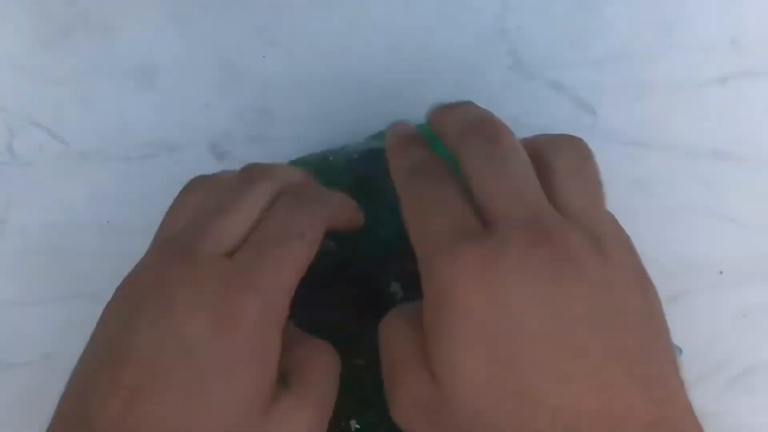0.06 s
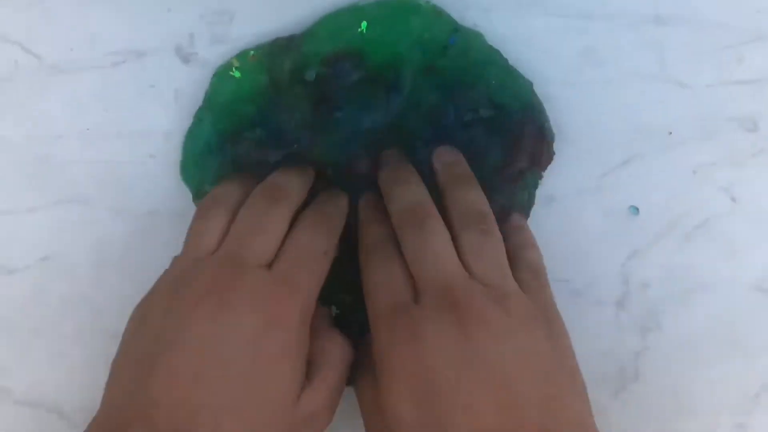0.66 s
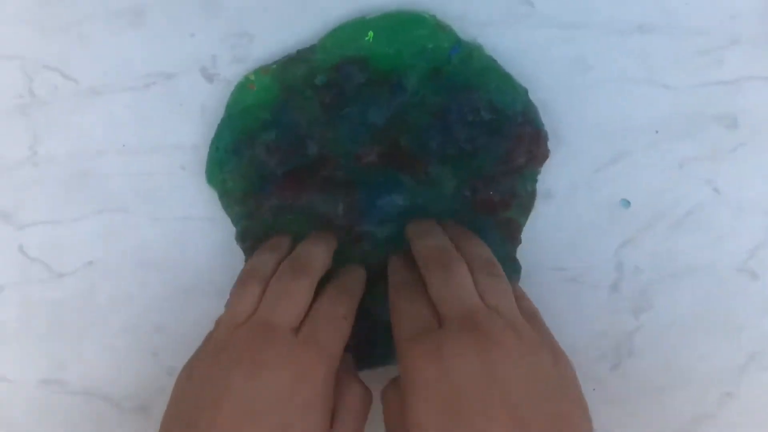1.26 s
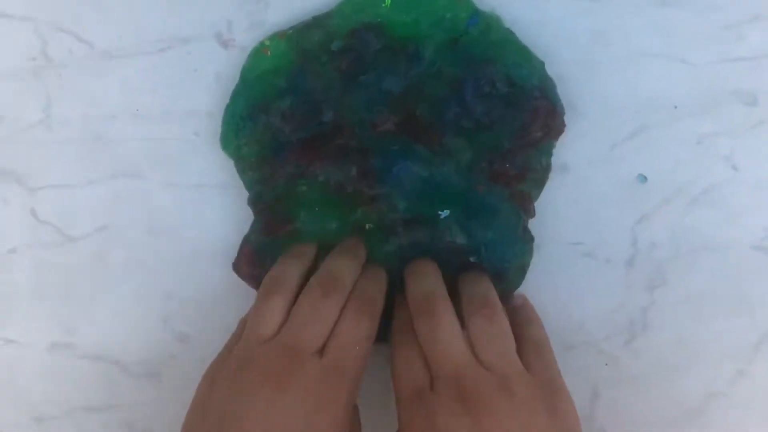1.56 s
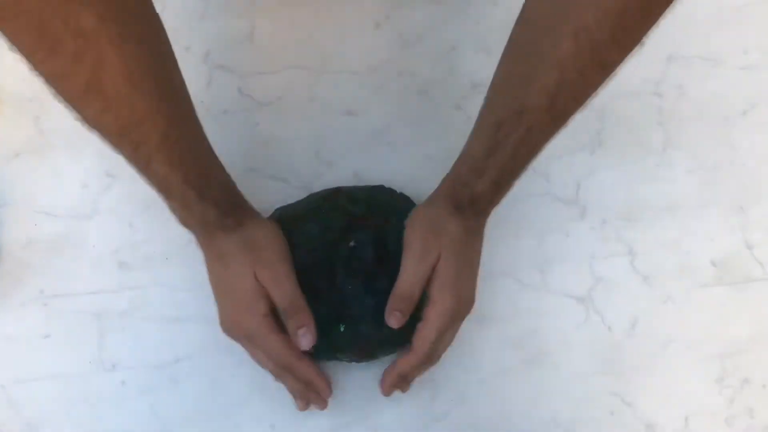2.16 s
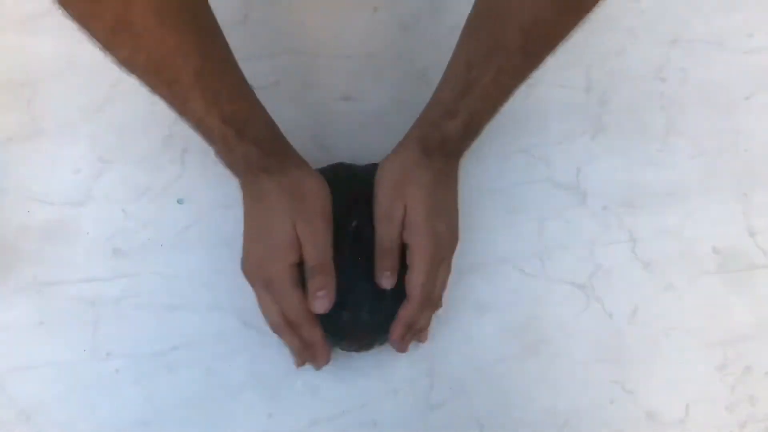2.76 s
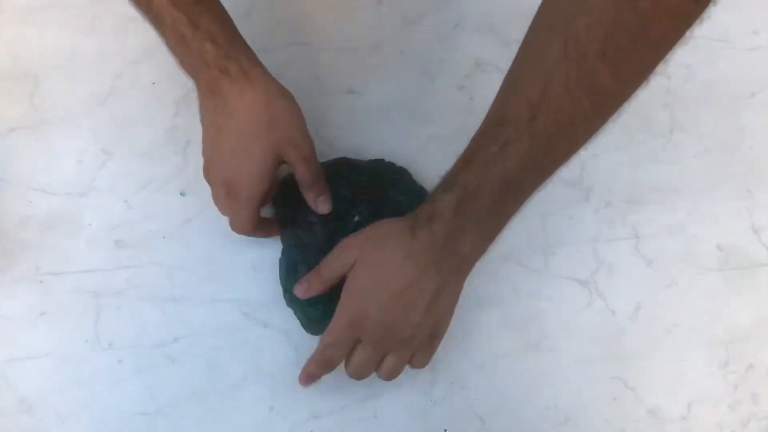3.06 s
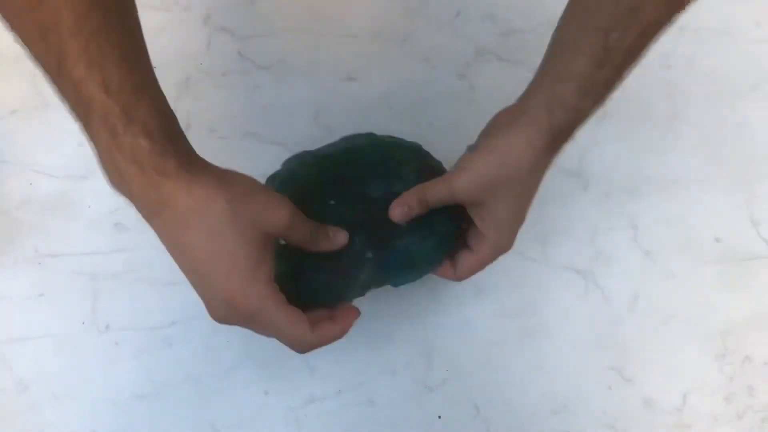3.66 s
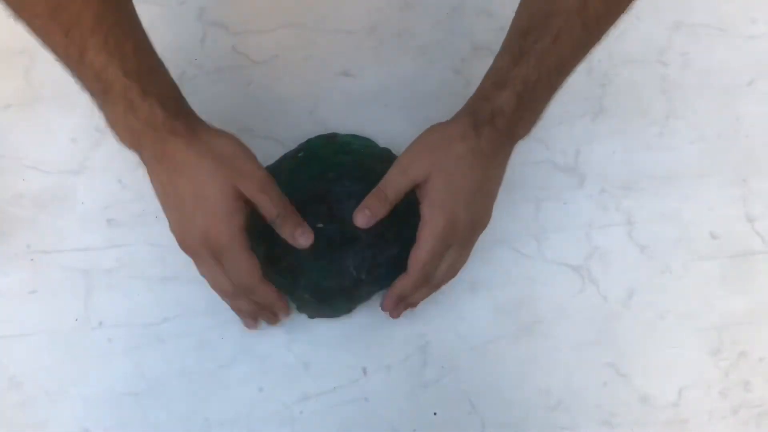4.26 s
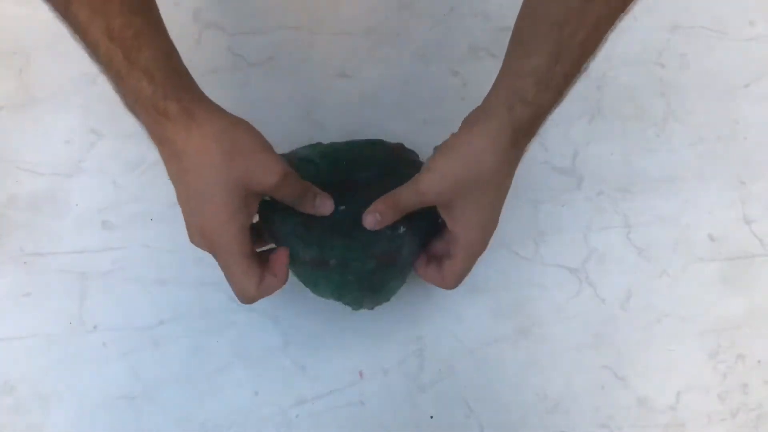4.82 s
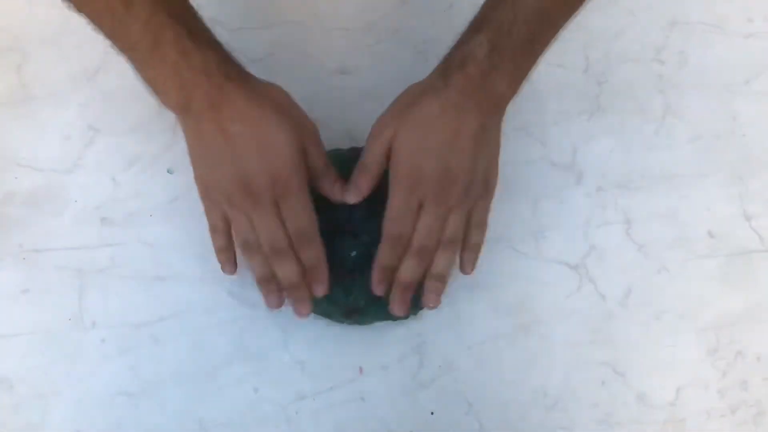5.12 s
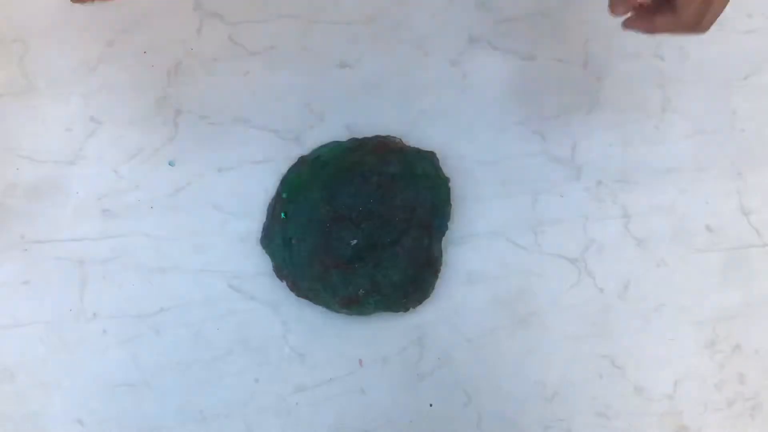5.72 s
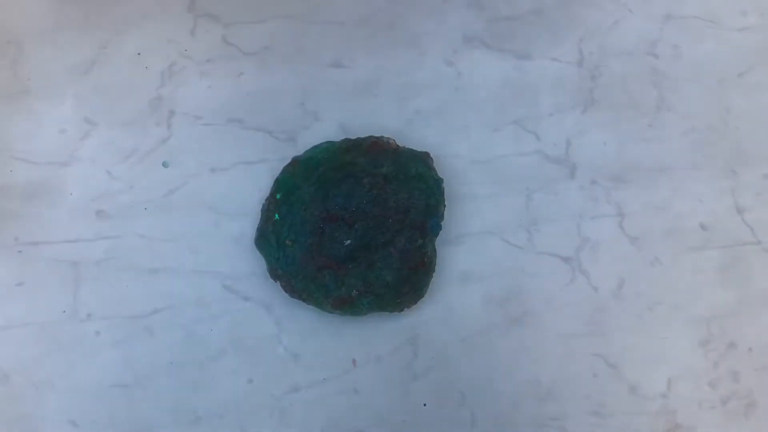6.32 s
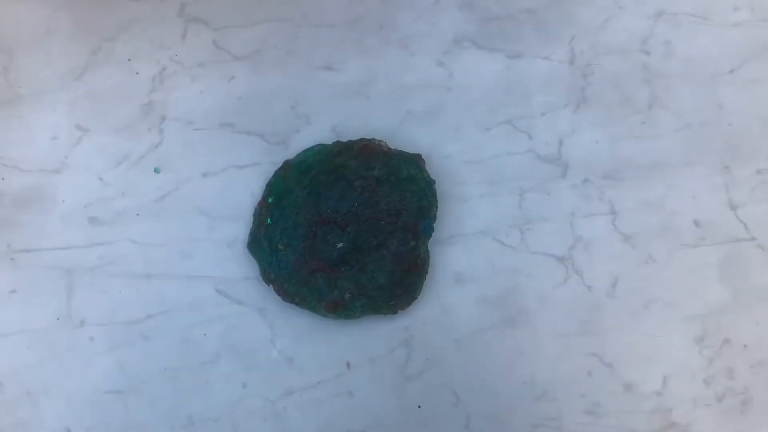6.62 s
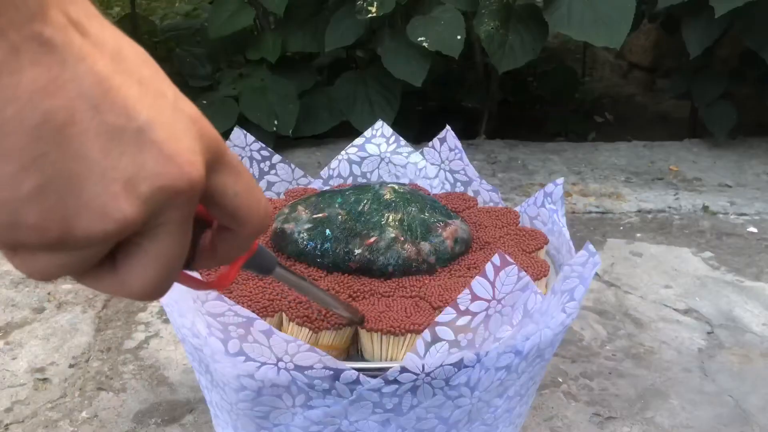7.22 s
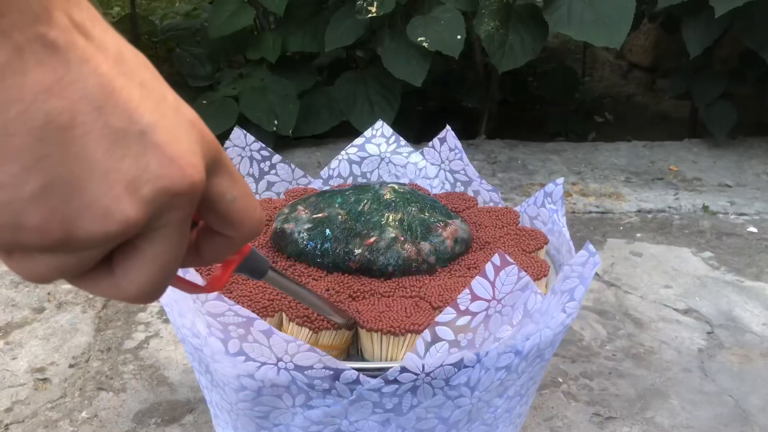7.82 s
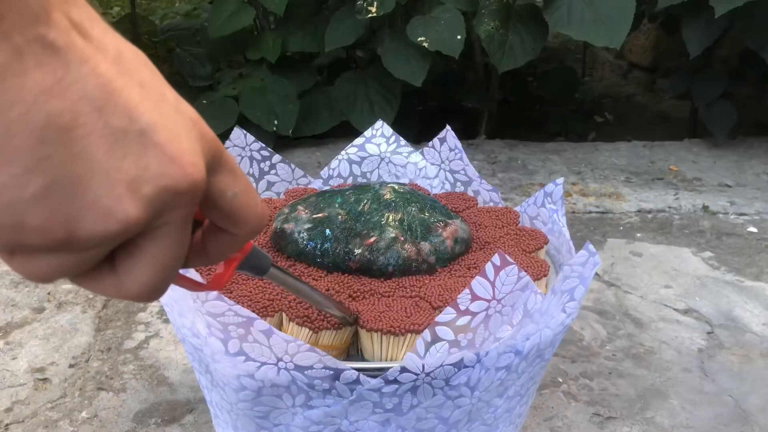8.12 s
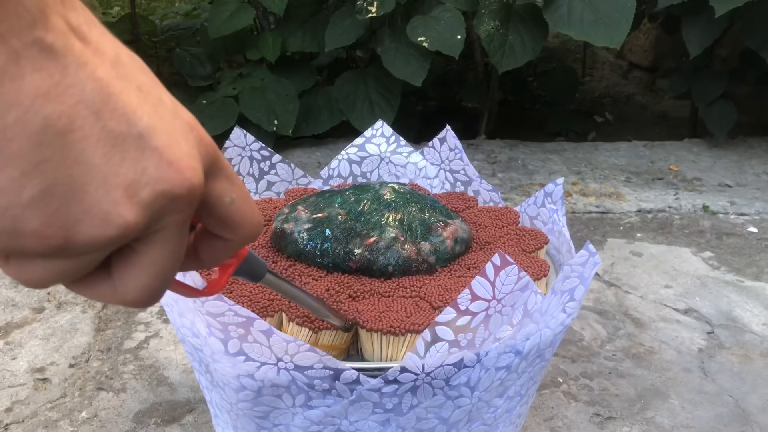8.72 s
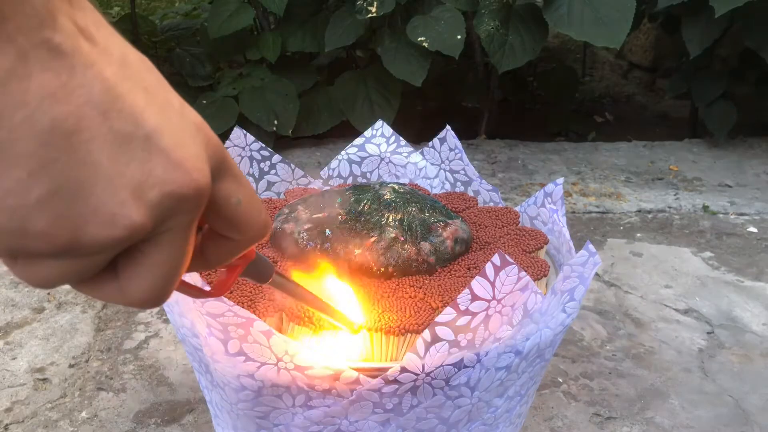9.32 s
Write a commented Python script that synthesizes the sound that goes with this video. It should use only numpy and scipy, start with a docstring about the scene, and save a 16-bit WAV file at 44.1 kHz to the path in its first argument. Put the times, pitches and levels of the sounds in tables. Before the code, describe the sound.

For the first two seconds, hands knead slime close to the microphone in a small room: wet squirts, bubbly pops, dull plops and fine sticky ticks over a low background hum. From about 1.9 seconds the kneading is further off, quieter and sparser, with soft rubbing and low thumps as the lump is pressed onto the table. It stops around 5.5 seconds, leaving quiet room noise with a thin, faint whine. Faint, distant bird-like chirps come between 3.3 and 3.9 seconds and again between 6 and 7.

At about 7 seconds the place changes to a yard with a steady distant rumble. A lighter trigger is pulled twice, each pull a run of small clicks ending in a sharp snap, at 7.4 and 8.2 seconds, followed by light rattles. One chirp sounds near 8.9 seconds. From 9.1 seconds match heads flare with a rush of gas and fine sputtering.

```python
"""Wet squirts and pops come from slime kneaded on a table top, first close by, then further off.
Trapped air tears out through the folds, opening pockets resonate, and the sticky skin ticks as it peels.
Pushes make the table boom, and faint bird-like chirps sound far away. Then, in a rumbling yard,
a piezo lighter is pulled twice, each impact ringing its barrel and grip, and a bundle of match heads
flares up with a rush of gas."""
import sys
import numpy as np
from scipy import signal
from scipy.fft import rfft, irfft, next_fast_len
from scipy.io import wavfile

SR = 44100
rng = np.random.default_rng(int(sys.argv[2]) if len(sys.argv) > 2 else 0)


def inscribe(sig):
    """Save sig as 16-bit PCM at rate SR to the path in sys.argv[1].

    A 1-D sig is mono; a 2-D sig holds one channel per row.
    Samples are clipped to [-1, 1] before scaling.
    """
    pcm = np.round(np.clip(np.atleast_2d(sig).T, -1, 1) * 32767)
    wavfile.write(sys.argv[1], SR, pcm.astype(np.int16))


N = 413658
TIME = np.arange(N) / SR
FAR_S, YARD_S = 1.891, 7.055  # the slime is further off; the yard begins


def undb(db):
    """Decibels to amplitude ratio."""
    return 10 ** (np.asarray(db) / 20)

def unit(x):
    """Normalisation to rms 1."""
    return x / np.sqrt(np.mean(x ** 2))

def at_hz(points, hz):
    """Interpolation of (frequency_hz, value) points on a log-frequency axis."""
    frequencies, values = np.transpose(points)
    return np.interp(np.log(np.maximum(hz, 1)), np.log(frequencies), values)

def add(track, start_s, sound):
    """Superposition: a sound joins the track at start_s."""
    i = max(int(start_s * SR), 0)
    track[i:i + len(sound)] += sound[:N - i]

def colour(x, points, size=4096):
    """Minimum-phase filtering to a (frequency_hz, density_db) spectrum, at unit power gain."""
    cepstrum = irfft(np.log(undb(at_hz(points, np.fft.rfftfreq(size, 1 / SR)))))
    cepstrum[1:size // 2] *= 2
    cepstrum[size // 2 + 1:] = 0
    response = irfft(np.exp(rfft(cepstrum)))
    return signal.fftconvolve(x, response / np.linalg.norm(response))[:len(x)]

def octaves(x):
    """Band splitting into overlapping octaves from 32 Hz up: yields (centre_hz, band)."""
    size = next_fast_len(len(x))
    spectrum = rfft(x, size)
    octave = np.log2(np.linspace(1, SR / 2, len(spectrum)) / 32)
    for k in range(10):
        yield 32 * 2 ** k, irfft(spectrum * np.maximum(1 - abs(octave - k), 0), size)[:len(x)]

def waver(rate_hz):
    """Slow random modulation with a spread near 1."""
    steps = rng.standard_normal(4096)
    return np.interp(TIME * rate_hz, np.arange(len(steps)), steps)

def moving_air(spectrum, flicker_db, rate_hz):
    """Fluctuating flow: coloured noise whose octaves waver independently."""
    noise = colour(rng.standard_normal(N), spectrum)
    return unit(sum(band * undb(flicker_db * waver(rate_hz)) for _, band in octaves(noise)))

def ring(modes, t):
    """Free vibration: each mode is an exponentially damped sine."""
    return sum(undb(db) * np.sin(2 * np.pi * hz * t) * 1000 ** (-t / t60) for hz, db, t60 in modes)

def reverb(x, decay_times, tilt_db, build_s):
    """Diffuse field: each octave has its own decay; the level tilts by tilt_db an octave about 1 kHz."""
    t = TIME[:SR]
    tail = sum(band * 1000 ** (-t / at_hz(decay_times, hz)) * undb(tilt_db * np.log2(hz / 1000))
               for hz, band in octaves(rng.standard_normal(SR)))
    return signal.fftconvolve(x, tail * (1 - np.exp(-t / build_s)) / np.sqrt(SR / 32))[:N]

def ruptures(count, per_s, spread_db):
    """Poisson process: tiny impulses of random sign and unequal size."""
    impulses = (rng.random(count) < per_s / SR) * rng.choice([-1, 1], count)
    return impulses * undb(spread_db * np.minimum(rng.exponential(size=count), 4))

def tearing(runs, per_s, spread_db, edge=1):
    """Shot noise that swells and fades in each (start_s, length_s, rms_db); a small edge flattens it."""
    out = np.zeros(N)
    for start_s, length_s, db in runs:
        count = int(length_s * SR)
        crackle = ruptures(SR, per_s, spread_db) + rng.standard_normal(SR) / 20
        arch = abs(np.sin(np.linspace(0, np.pi, count))) ** edge
        add(out, start_s, undb(db) * unit(crackle[:count] * arch))
    return out

def pocket(first_hz, last_hz, swell_ms, glide=1.3, overtone_db=-17, wobble=0.19):
    """Cavity resonance: the pitch slides as an opening pocket changes size; soft walls damp it at once."""
    age = TIME[:SR // 15] * 1000 / swell_ms  # 1 at full size
    depth = min(first_hz / 1000, 1)  # the tearing rim flutters most in small, high pockets
    flutter, sway = (depth * np.interp(age, np.arange(200) / 3, rng.standard_normal(200))
                     for _ in range(2))
    hz = (last_hz + (first_hz - last_hz) * np.exp(-age / glide)) * np.exp(wobble * sway)
    phase = 2 * np.pi * np.cumsum(hz) / SR
    envelope = age * np.exp(1 - age) * (1 + flutter / 2)
    return envelope * (np.sin(phase) + undb(overtone_db) * np.sin(2 * phase))

def swarm(spans, centre_hz, spread, swell_cycles, scatter_db, fall=0.755):
    """Resonance of many pockets of random size in each (start_s, end_s, pockets_per_s, level_db)."""
    out = np.zeros(N)
    for start_s, end_s, per_s, db in spans:
        draws = rng.uniform(-1, 1, (99, 3))[:int((end_s - start_s) * per_s)]
        for k, (jitter, pitch, loudness) in enumerate(draws):
            hz = centre_hz * np.exp(spread * pitch)
            onset_s = start_s + (end_s - start_s) * (k + .5 + jitter / 2) / len(draws)
            pop = pocket(hz, hz * fall, swell_ms=swell_cycles * 1000 / hz)
            add(out, onset_s, undb(db + scatter_db * loudness) * pop)
    return out


# Squeezes, each a squirt, a small blister, then the big pocket behind it:
# start_s, squirt_length_s, squirt_db, blister_hz, blister_db, pocket_wait_s, pocket_hz, pocket_db
SQUEEZES = [(0.0, 0.02, -29.5, 632, -11, .006, 293, -18.5),
            (0.421, 0.023, -42.5, 1300, -50, .031, 420, -28.5),
            (0.436, .02, -29.5, 2200, -47, 0.024, 810, -21.5),
            (0.454, .012, -31.5, 1204, -28, .011, 607, -22.5),
            (0.639, .036, -45.5, 423, -26.5, 0.028, 517, -22.5),
            (0.849, .036, -27.5, 1700, -20.5, .011, 560, -11.5),
            (1.277, .013, -28.5, 2314, -18.5, .011, 396, -17),
            (1.295, 0.017, -34.5, 1205, -26, .010, 1000, -17.5),
            (1.495, .007, -31, 2710, -28, .006, 563, -23.5), (1.635, .006, -25, 2082, -21, .013, 900, -24),
            (1.64, 0.035, -36, 1477, -22, 0.019, 557.4, -19),
            (3.740, 0.0097, -43, 2400, -25.5, 0.0056, 520, -31),
            (4.961, 0.0096, -43.5, 1280, -42, 0.018, 408.5, -25),
            (5.163, 0.016, -53, 1306, -52, .018, 256, -36)]
# Spectrum of tearing wet films: frequency_hz, density_db
FILM_SPECTRUM = [(250, -8.5), (600, 2), (1200, 10.5), (1900, -8.5), (2800, 5.5), (4400, -6), (7000, -4),
                 (11500, 1.5), (15500, -8)]

def squirts(froth_per_s=420, froth_db=3, fizz_per_s=900, fizz_db=-1, tear_db=-2):
    """Film rupture: escaping air tears wet films and bursts a froth of bubbles; the tiniest fizz."""
    runs = [row[:3] for row in SQUEEZES]
    froth = swarm([(s, s + length_s, froth_per_s, db + froth_db) for s, length_s, db in runs],
                  centre_hz=1120, spread=.9, swell_cycles=1.1, scatter_db=1)
    fizz = swarm([(s, s + length_s, fizz_per_s, db + fizz_db) for s, length_s, db in runs],
                 centre_hz=9750, spread=.3, swell_cycles=3.1, scatter_db=0)
    films = colour(tearing(runs, per_s=8100, spread_db=1.5), FILM_SPECTRUM)
    return undb(tear_db) * films + froth + fizz

# Dull plops as a finger sinks in or pulls out: start_s, first_pitch_hz, level_db
PLOPS = [(0.035, 483, -25), (0.061, 423, -31), (0.875, 411, -25), (0.902, 470, -29), (0.950, 965, -28),
         (1.051, 618, -26.5), (1.244, 330, -26.5), (1.274, 760, -22), (1.284, 1250, -20), (1.295, 245, -24),
         (1.327, 484, -27), (1.376, 440, -26), (1.443, 870, -22), (1.453, 220, -27), (1.515, 400, -27.5),
         (1.580, 523.3, -29), (1.608, 364, -27), (1.626, 897, -26), (1.670, 1437, -20), (1.741, 453, -24.5),
         (1.780, 470, -23.5), (1.798, 524, -24.5), (1.856, 450, -29), (3.065, 432, -38),
         (3.750, 300, -28.5), (3.987, 400, -43.5), (4.218, 523, -33.5), (4.368, 458, -31.5),
         (4.445, 333, -32), (4.973, 1357, -37.5), (5.182, 1420, -41), (5.347, 1310, -41.5),
         (5.355, 384, -39.5)]

def pops(plop_fall=.44, blister_fall=.585, pocket_fall=.66, slump_db=-16, slump_hz=108, slump_s=.01):
    """Cavities resonate, gliding by a fall ratio in pitch; the mass slumps into each gap with a thud."""
    out, t = np.zeros(N), TIME[:SR // 10]
    # start_s, first_hz, last_hz, level_db, swell_ms
    openings = [(s, hz, hz * plop_fall, db, 2.9) for s, hz, db in PLOPS]
    for s, _, _, blister_hz, blister_db, wait_s, hz, db in SQUEEZES:
        openings += [(s + .2 * wait_s, blister_hz, blister_hz * blister_fall, blister_db, 2.3),
                     (s + wait_s, hz / pocket_fall ** .5, hz * pocket_fall ** .5, db, 3.4)]
    for start_s, first_hz, last_hz, db, swell_ms in openings:
        thud_hz = slump_hz * rng.uniform(.8, 1.5)
        slump = t / slump_s * np.exp(1 - t / slump_s) * np.sin(2 * np.pi * thud_hz * t)
        add(out, start_s, undb(db) * pocket(first_hz, last_hz, swell_ms))
        add(out, start_s + 2 * swell_ms / 1000, undb(db + slump_db) * slump)
    return out

# Hand strokes that rub and peel the slime: start_s, length_s, level_db
STROKES = [(0.0, 0.047, -51), (0.19, 0.18, -63.5), (0.46, 0.051, -59), (0.64, 0.27, -67.5),
           (0.86, .32, -70.5), (1.76, 0.15, -62.5), (2.215, 0.046, -77), (2.37, 0.074, -77),
           (2.56, 0.27, -78.5), (2.95, 0.64, -73.5), (3.61, 0.3, -72.5), (3.97, 0.28, -75.5),
           (4.35, 0.48, -74), (4.88, .19, -75), (5.22, 0.31, -78.5)]
# Spectrum of the dragged mass: frequency_hz, density_db
RUB_SPECTRUM = [(60, -9), (160, 4), (350, -4), (1000, -7), (2000, -20.5), (5000, -33)]

def rubbing(gain_db=14):
    """Friction: each stroke drags the soft mass with a dull squish."""
    return undb(gain_db) * colour(tearing(STROKES, per_s=130, spread_db=3.5, edge=.5), RUB_SPECTRUM)

# Sticky skin letting go: start_s, peak_db, centre_hz
TICKS = [(0.206, -34.5, 3050), (0.2674, -30, 9490), (0.3095, -31, 7610), (0.332, -41, 11500),
         (0.642, -34, 7000), (0.69, -38.5, 5900), (0.7464, -36, 9000), (1.0754, -31.5, 2460),
         (1.1153, -34.5, 11400), (1.2683, -23, 8000), (2.6333, -35.5, 4900), (3.497, -40.5, 10100),
         (4.0567, -37.5, 9200), (4.2134, -41.5, 4900), (4.448, -41.5, 2580), (5.1697, -32.5, 3380),
         (5.3458, -25.5, 6000)]
# Spectrum of the peeling crackle: frequency_hz, density_db
PEEL_SPECTRUM = [(700, -5), (2500, -3.5), (6000, -2.5), (11000, -1), (15500, -10)]

def peeling(decay_s=.0016, skirt_db=-13, peel_db=-.3, strand_db=4, strands_per_s=45):
    """Adhesive failure: slime leaves skin and table strand by strand, in ticks and a fine crackle."""
    ticks, t = np.zeros(N), TIME[:SR // 20]
    for start_s, db, hz in TICKS:
        burst = rng.standard_normal(len(t)) * np.exp(-t / decay_s)
        tick = colour(burst, [(hz / 10, 2 * skirt_db), (hz, 0), (hz * 3, skirt_db)])
        add(ticks, start_s, undb(db) * tick / abs(tick).max())
    strands = undb(peel_db + strand_db * waver(strands_per_s))
    crackle = colour(tearing(STROKES, per_s=450, spread_db=4.5, edge=.5), PEEL_SPECTRUM)
    return ticks + strands * crackle

# Spells of steady kneading: start_s, end_s, pockets_per_s, pitch_hz, level_db
KNEADING = [(0.03, 1.87, 28, 520, -42), (0.885, 1.0, 300, 1000, -40), (1.0, 1.11, 200, 850, -43),
            (2.95, 3.55, 34, 750, -52), (3.75, 4.85, 16, 560, -53)]

def gurgle():
    """Cavity resonance in numbers: kneading works tiny pockets loose."""
    return sum(swarm([(start_s, end_s, per_s, db)], hz, spread=.591, swell_cycles=1.8, scatter_db=3)
               for start_s, end_s, per_s, hz, db in KNEADING)

# Reverberation time of the small room: frequency_hz, t60_s
ROOM_DECAY = [(100, 0.5), (500, 0.26), (1500, 0.13), (4000, 0.078), (14000, .14)]

def in_room(x, wet_db, top_hz):
    """Reverberation: wall reflections join the direct sound, both with the finest treble softened."""
    direct = signal.lfilter(*signal.butter(2, top_hz, fs=SR), x)
    return direct + undb(wet_db) * reverb(direct, ROOM_DECAY, tilt_db=-1, build_s=.0047)

# Spectra of the room's background, close by and further off: frequency_hz, density_db
NEAR_AIR_SPECTRUM = [(25, -9.5), (70, 6.5), (166, 1), (326, -5), (420, -12.5), (820, -10.5), (2000, -29),
                     (2840, -29.5), (11300, -40), (16000, -55)]
FAR_AIR_SPECTRUM = [(25, -23), (55, -0.5), (120, -1.5), (165, 3.5), (215, -6.5), (280, -7.5), (340, -1.5),
                    (400, -9.5), (780, -8.5), (1260, -18), (1500, -21), (1900, -30), (6000, -40),
                    (14000, -43.5), (16000, -58)]

def room_air(near_db=-44, far_db=-53.5, whine_hz=1455, whine_db=-15, dip_db=-8.5, recover_s=.95):
    """Ambient noise: a dull background that dips at FAR_S and comes part way back with a thin whine."""
    near = moving_air(NEAR_AIR_SPECTRUM, flicker_db=1.5, rate_hz=18)
    whine_phase = 2 * np.pi * np.cumsum(whine_hz + 4 * waver(30)) / SR
    whine = np.sin(whine_phase) * undb(whine_db + 2 * waver(15))
    far = moving_air(FAR_AIR_SPECTRUM, flicker_db=.25, rate_hz=9) + whine
    fade_db = dip_db * np.clip(1 - (TIME - FAR_S) / recover_s, 0, 1)
    return np.where(TIME < FAR_S, undb(near_db) * near, undb(far_db + fade_db) * far)

# Palms pressing the lump on to the table: start_s, level_db
PRESSES = [(2.634, -57), (2.96, -45.5), (3.119, -48), (3.745, -43), (3.797, -43.5), (4.218, -50),
           (4.369, -42), (4.974, -47), (5.176, -52.5), (5.35, -46.5)]
# Modes of the table top: pitch_hz, level_db, t60_s
TABLE_MODES = [(76, 3, 0.16), (99.7, 6, 0.29), (125, -14, 0.48), (161.5, 2, 0.21)]

def table_booms(push_s=.0045):
    """Plate vibration: soft pushes excite the low modes of the table top."""
    out, t = np.zeros(N), TIME[:SR // 2]
    boom = ring(TABLE_MODES, t) * (1 - np.exp(-t / push_s))
    for start_s, db in PRESSES:
        add(out, start_s, undb(db) * boom)
    return out

# Far-off, bird-like chirps: start_s, pitch_hz, level_db
CHIRPS = [(3.345, 4070, -56), (3.553, 1770, -49), (3.86, 2020, -50), (6.085, 6500, -68), (6.095, 2170, -58),
          (6.155, 6300, -61.5), (6.954, 2490, -57), (8.906, 1312, -32.5)]

def chirps(length_s=.026, fall=.09, direct_db=-19, scattered_db=-5):
    """Scattering: short, slightly falling notes arrive mostly by way of the walls."""
    notes = np.zeros(N)
    along = np.linspace(-1, 1, int(length_s * SR))
    envelope = np.cos(np.pi * along / 2) ** 2
    for start_s, hz, db in CHIRPS:
        phase = 2 * np.pi * np.cumsum(hz * (1 - fall * along)) / SR
        add(notes, start_s, undb(db) * envelope * np.sin(phase))
    scattered = reverb(notes, ROOM_DECAY, tilt_db=4, build_s=.0017)
    return undb(direct_db) * notes + undb(scattered_db) * scattered

# Spectrum of the yard's background: frequency_hz, density_db
RUMBLE_SPECTRUM = [(25, -26.5), (59, 0), (127, -1.5), (180, -4), (225, -0.5), (330, -11), (560, -14),
                   (1130, -20), (1300, -20.5), (1500, -28.5), (2110, -35.5), (8600, -43), (16000, -49)]

def yard_rumble(level_db=-42):
    """Ambient noise: a distant rumble that wavers slightly."""
    return undb(level_db) * moving_air(RUMBLE_SPECTRUM, flicker_db=.74, rate_hz=10)

# Stages of each trigger pull: finger_lands_s, slack_taken_s, first_catch_s, second_catch_s, hammer_s
PULLS = [(7.0816, 7.1669, 7.1887, 7.2940, 7.4120), (7.876, 7.9620, 7.9810, 8.0776, 8.1816)]
# Impact of each stage in that order, rings relative to the crack: crack_db, barrel_db, grip_db
STAGES = [(-27.5, -10, -1.5), (-29, -10, -6), (-12.5, -16, -8.5), (-22.5, -17, -5), (-4, -4, -10.5)]
# The released trigger rattling: start_s, level_db
RATTLES = [(7.513, -32.5), (8.2883, -36.5), (8.3637, -29.5), (8.4729, -29.5)]

def trigger_clicks(second_pull_db=-.8, loose_barrel_db=-12, loose_grip_db=-2.5,
                   bounce_s=.01, bounce_db=-9, bounce_grip_db=4.5):
    """Impact and rebound, light contacts bouncing once: rows of start_s, crack_db, barrel_db, grip_db."""
    stages = [(s, db + k * second_pull_db, *rings)
              for k, pull in enumerate(PULLS) for s, (db, *rings) in zip(pull, STAGES)]
    rattles = [(s, db, loose_barrel_db, loose_grip_db) for s, db in RATTLES]
    landings = [(pull[0], STAGES[0][0]) for pull in PULLS]
    bounces = [(s + bounce_s, db + bounce_db, loose_barrel_db, bounce_grip_db)
               for s, db in landings + RATTLES]
    return stages + rattles + bounces

# Modes of the lighter's barrel and grip: pitch_hz, level_db, t60_s
BARREL_MODES = [(2890, -20.5, 0.022), (3217, 10, 0.012), (3367, -10, 0.034), (3550, 0, 0.012),
                (5700, -17.5, .009), (8660, 10, .006)]
GRIP_MODES = [(1240, -6.5, 0.011), (1343, -0.5, 0.02), (1582, 1, 0.013)]
# Spectra of the direct crack and of the sound reaching the walls: frequency_hz, density_db
CRACK_SPECTRUM = [(250, -20.5), (900, -2), (1600, -1.5), (2100, -5), (3200, -2.5), (5000, -2.5), (7000, -3),
                  (8600, -4), (12500, -1), (13500, -17.5), (16000, -10)]
WALL_SPECTRUM = [(300, -19.5), (1350, 9.5), (2100, -7), (2750, 1), (3270, 8.5), (3900, -2.5), (5200, 0.5),
                 (8600, -1), (12500, 0), (15500, -17.5)]
# Reverberation time of the yard: frequency_hz, t60_s
YARD_DECAY = [(300, .3), (1400, 0.41), (3300, 0.46), (9000, 0.3), (15000, .25)]

def lighter(crack_s=.0025, rise_s=.0011, ground_delay_s=.01, ground_db=-20, walls_db=-3):
    """Impact excitation: a brief chatter of parts rings barrel and grip; ground and walls reflect it."""
    out, blows, t = np.zeros(N), np.zeros(N), TIME[:SR // 10]
    for start_s, db, barrel_db, grip_db in trigger_clicks():
        crack = colour(rng.standard_normal(len(t)) * np.exp(-t / crack_s), CRACK_SPECTRUM)
        crack *= 3.54 / np.linalg.norm(crack)
        barrel = undb(barrel_db) * ring(BARREL_MODES, t)
        grip = undb(grip_db) * ring(GRIP_MODES, t * rng.uniform(.94, 1.03))
        add(out, start_s, undb(db) * (crack + (barrel + grip) * (1 - np.exp(-t / rise_s))))
        add(blows, start_s, undb([db]))
    add(out, ground_delay_s, undb(ground_db) * out)
    # the yard gathers sound from all sides of the lighter, so its answer is smooth in colour
    walls = reverb(colour(blows, WALL_SPECTRUM), YARD_DECAY, tilt_db=1, build_s=.0031)
    return out + undb(walls_db) * walls

# Swell of the match heads catching: time_s, level_db
FLARE = [(9.13, -67), (9.155, -49), (9.2, -38), (9.26, -37), (9.38, -35.5)]
# Spectrum of the flame: frequency_hz, density_db
FLAME_SPECTRUM = [(120, -8), (300, -7), (550, 2.5), (1000, -6.5), (1700, -12), (2600, -18), (3800, -17),
                  (4900, -23), (5800, -12), (7800, -18.5), (10000, -18), (12800, -22.5), (15500, -32)]

def matches(sputter_db=-9):
    """Combustion noise: gas rushes from the burning heads and fine sparks sputter in it."""
    times_s, levels_db = np.transpose(FLARE)
    swell = undb(np.interp(TIME, times_s, levels_db)) * (TIME > times_s[0])
    sputter = unit(colour(ruptures(N, per_s=1500, spread_db=1.5), FLAME_SPECTRUM))
    gas = moving_air(FLAME_SPECTRUM, flicker_db=.5, rate_hz=26)
    return swell * (gas + undb(sputter_db) * sputter)


def scene():
    """Superposition: slime in the room, more reverberant further off, then the yard; chirps in both."""
    yard = lighter() + matches() + yard_rumble()
    slime = gurgle() + pops() + squirts() + peeling() + rubbing() + table_booms()
    air = room_air()
    near = in_room(slime, wet_db=-6, top_hz=14500)
    far = in_room(slime * (TIME > FAR_S), wet_db=-4.5, top_hz=12700)
    room = np.where(TIME < FAR_S, near, far) + air
    return (np.where(TIME < YARD_S, room, yard) + chirps())[None]

def record(dry, ceiling=.8, top_hz=15900):
    """Soft saturation rounds the loudest snaps; a steep low-pass cuts the top."""
    lowpass = signal.ellip(10, .2, 70, top_hz, fs=SR, output="sos")
    return signal.sosfilt(lowpass, ceiling * np.tanh(dry / ceiling))


dry = scene()
out = record(dry)
inscribe(out)
```